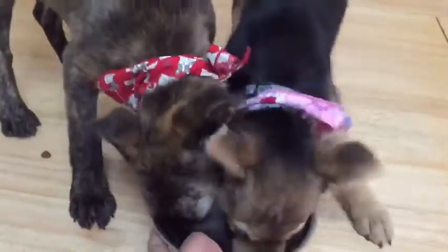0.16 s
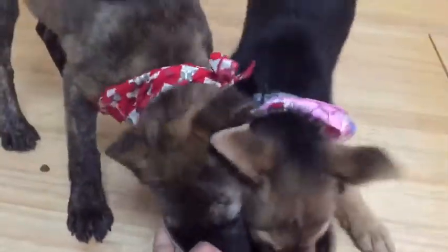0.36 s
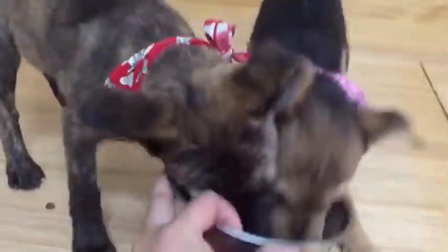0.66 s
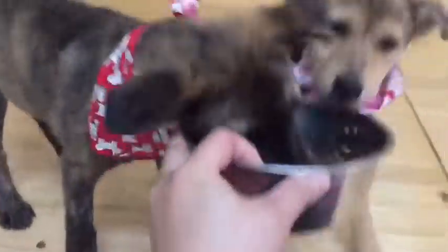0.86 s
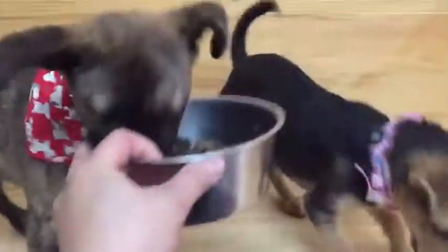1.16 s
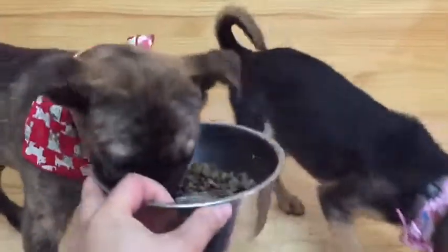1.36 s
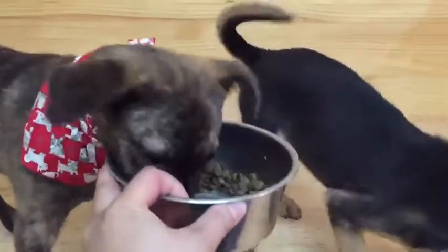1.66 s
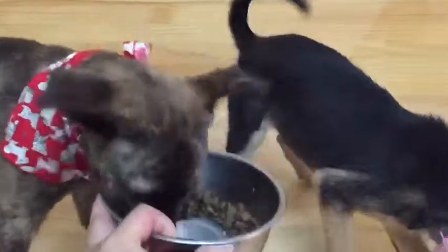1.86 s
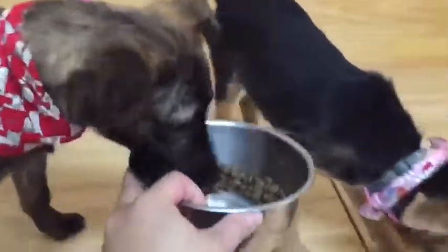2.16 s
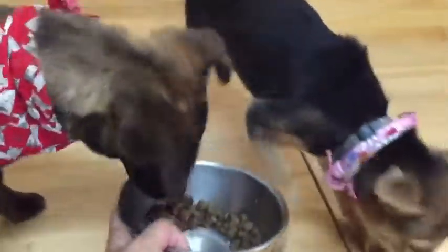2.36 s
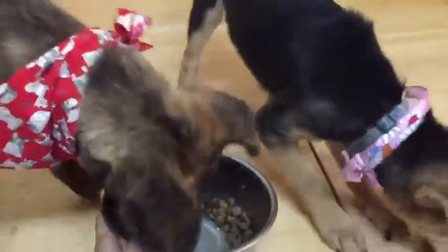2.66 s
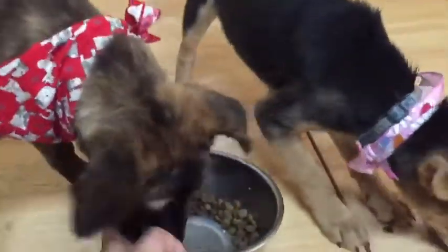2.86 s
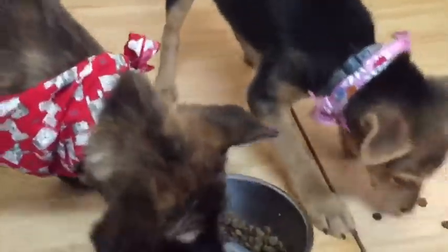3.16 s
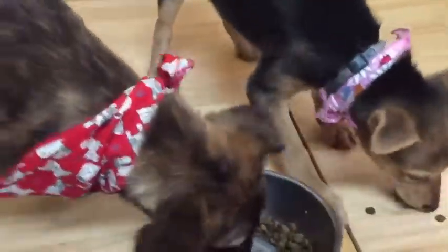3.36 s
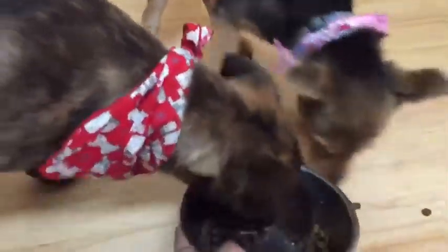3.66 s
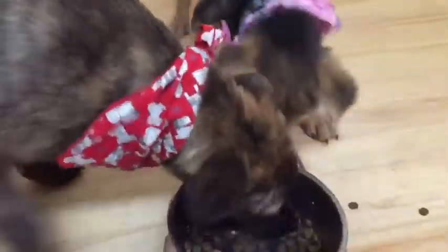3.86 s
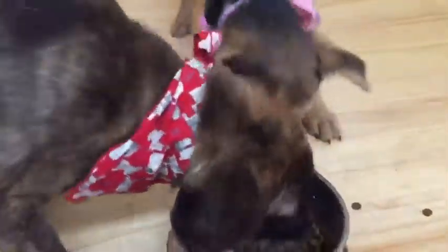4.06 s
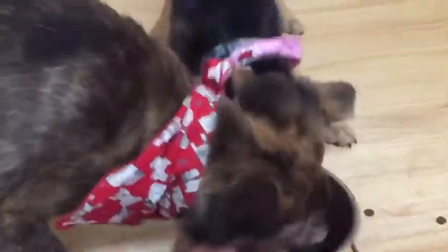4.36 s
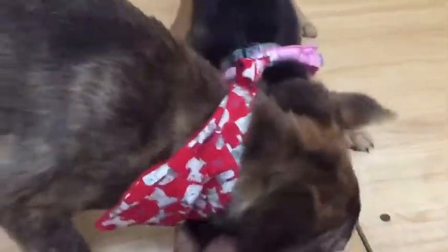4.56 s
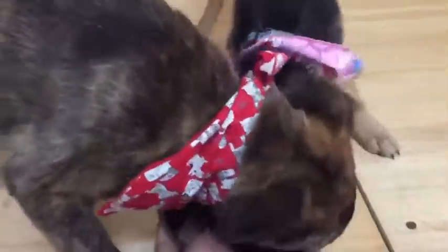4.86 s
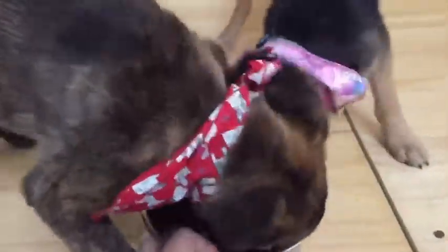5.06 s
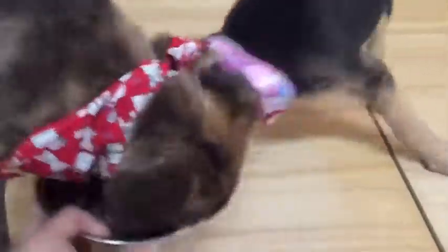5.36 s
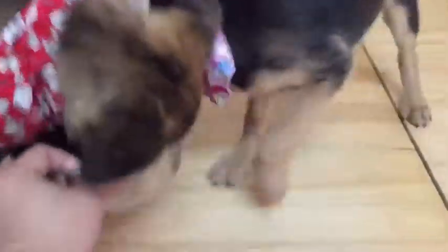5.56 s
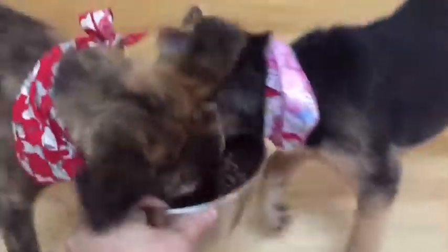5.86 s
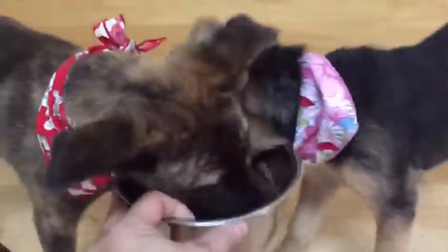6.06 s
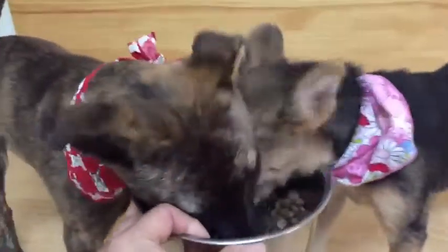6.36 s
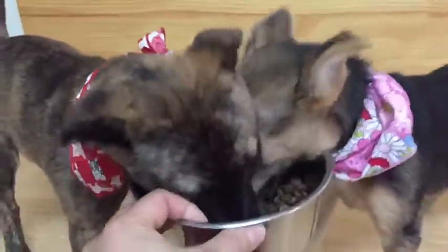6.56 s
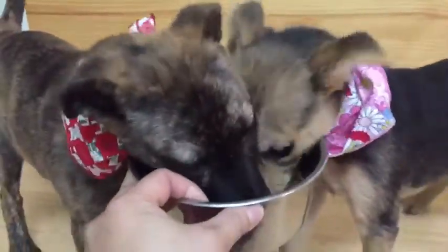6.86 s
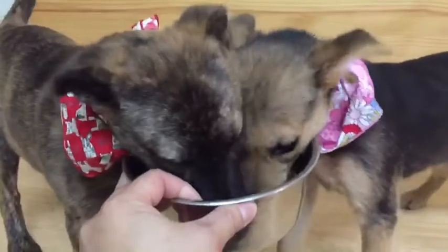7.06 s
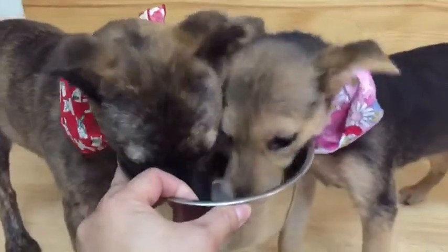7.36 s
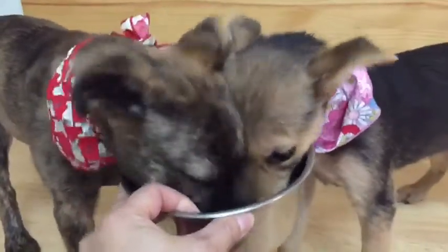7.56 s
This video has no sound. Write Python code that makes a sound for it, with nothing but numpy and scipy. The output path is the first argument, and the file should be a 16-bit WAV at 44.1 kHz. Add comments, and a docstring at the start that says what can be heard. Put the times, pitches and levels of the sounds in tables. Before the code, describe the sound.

Two puppies crunch dry kibble from a steel bowl, pellets rattling, teeth cracking and clicking on metal, with collar tinkles and a few hard bumps indoors.

```python
"""Two puppies eat dry kibble from a hand-held steel bowl over a wooden floor, in a small room.
From the start muzzles stir the pellets, a rattle of many small impacts, and teeth crack them by brittle
fracture. Clicks on the steel and paws shuffling by friction run throughout; metal pieces, likely on a
collar, tinkle in thin modes, mouths smack at a resonance, and later bumps set bowl and boards ringing.
Stirring thins out, and back teeth grind in muffled crackles, over reflections and still air."""
import sys
import numpy as np
from scipy import signal
from scipy.fft import rfft, irfft, next_fast_len
from scipy.io import wavfile
from scipy.ndimage import uniform_filter1d, map_coordinates

SR = 44100
rng = np.random.default_rng(int(sys.argv[2]) if len(sys.argv) > 2 else 0)


def digitize_waveform(pressure):
    """Quantize a signal to 16-bit integers and store it at the path in sys.argv[1].

    Rows of a 2-D input are taken as channels; values are limited to [-1, 1].
    """
    field = np.atleast_2d(pressure).T
    bounded = np.clip(field, -1, 1)
    quanta = np.round(bounded * 32767).astype(np.int16)
    wavfile.write(sys.argv[1], SR, quanta)


N = 340452  # samples

# Levels are relative: a source may add an offset of its own to all of its events.
# muzzle thrusts into the pellets, about three a second: (time of full force [s], hold [s], level [dB])
THRUSTS = [(0.064, 0.13, -38), (0.266, 0.15, -31), (0.542, 0.015, -27), (0.647, 0.18, -30),
           (0.964, 0.017, -36), (1.177, 0.049, -34.5), (1.37, 0.15, -45), (1.509, 0.05, -38),
           (1.784, 0.1, -44.5), (1.988, 0.026, -43.5), (2.235, 0.091, -56), (2.956, 0.5, -51),
           (3.573, 0.23, -36.5), (3.866, 0.13, -35), (4.162, 0.25, -42), (4.431, 0.065, -28.5),
           (4.707, 0.046, -29.5), (5.036, 0.068, -32.5), (5.304, 0.16, -38.5), (5.518, 0.053, -43.5),
           (5.705, 0.18, -42.5), (6.159, 0.014, -35.5), (6.382, 0.14, -50.5), (6.842, 1, -54)]
THRUST_ATTACK_S, THRUST_T60_S = 0.043, 0.39
# loose pellets shifting between the thrusts: (time [s], level [dB])
SHIFTING = [(0.0, -38.5), (1.68, -65.5), (7.72, -65)]
# spectrum of pellets rubbing and colliding: (frequency [Hz], density [dB per Hz])
PELLET_SPECTRUM = [(300, -39), (700, 8.5), (1700, 5.5), (2500, 6), (3600, 10), (5000, 1.5), (6200, 5.5),
                   (8000, -5), (11000, -3), (15500, -16)]
# teeth crack a pellet, or now and then a wet tongue or lip clicks: (time [s], level [dB], treble snap re that
# level [dB])
BITES = [(0.039, -23, -32), (0.167, -23.5, -8), (.199, -23, -7.5), (.3405, -19, -38), (0.367, -22.5, -1),
         (.408, -21.5, -8.5), (0.4777, -20, -15), (0.5262, -17, -15), (0.5597, -15.5, -10),
         (.7, -18, -12.5), (0.7761, -27, 5), (0.856, -30, 6), (0.965, -34, -3.5), (1.1175, -26, -10),
         (1.1694, -17.5, -11), (1.2288, -28, 0.5), (1.359, -36, -12), (1.4284, -28.5, -15),
         (1.6222, -33, -13), (1.788, -30.5, -5), (1.8906, -39.5, 9.5), (2.0257, -31.5, 4),
         (2.3077, -28, -22), (3.0051, -27, -7.5), (3.0694, -26.5, -17), (3.136, -26.5, -10),
         (3.1588, -25.5, -9.5), (3.5196, -33.5, 6), (4.34, -18, -13.5), (4.4662, -12, -17),
         (4.498, -13.5, -24), (4.7168, -19.5, -24), (4.749, -12, -17), (5.036, -33.5, 4),
         (5.0596, -8, -11.5), (5.184, -25.5, -15), (5.3799, -23, -11.5), (5.7867, -27.5, -13),
         (5.8824, -26.5, -4), (6.027, -36, 0.5), (6.267, -29.5, -15), (6.3687, -20.5, -13.5),
         (6.8412, -22, -24.5), (6.8801, -29, -52), (6.9958, -27, -26), (7.052, -27.5, -18),
         (7.3157, -29.5, -27), (7.567, -21, -14.5), (7.667, -26.5, -16)]
# spectrum of a crack or click: (frequency [Hz], density [dB per Hz])
CRACK_SPECTRUM = [(250, -12), (600, -4.5), (850, 11), (1150, 6), (1600, 17.5), (2500, 12), (3600, 17),
                  (5000, 3.5), (6300, 9.5), (8000, -1), (11000, -4), (15500, -19.5)]
# a tooth or pellet taps the steel, dry and short: (time [s], level [dB])
TAPS = [(.0863, -32), (.1152, -32), (.2649, -33), (.45, -29), (.7185, -24), (2.6779, -31), (3.288, -22.5),
        (3.3642, -26), (3.431, -28), (3.446, -28.5), (3.6406, -11.5), (3.66, -27), (3.756, -16),
        (3.9427, -17.5), (4.014, -25), (4.118, -24.5), (4.0364, -19), (4.1502, -23.5), (4.2025, -15),
        (4.2244, -17), (4.5611, -18), (4.7265, -15.5), (4.9157, -23), (5.073, -18), (5.333, -38),
        (5.406, -23.5), (5.461, -25), (5.5602, -25.5), (6.0896, -32.5), (6.653, -43), (7.197, -31.5),
        (7.238, -29), (7.385, -32), (7.5155, -26.5), (7.6149, -35)]
# the bowl or a paw bumps the boards: (time [s], level [dB], hard clatter re that level [dB])
BUMPS = [(1.128, -38.5, -10), (2.384, -39, -17), (2.742, -36.5, -56), (3.2504, -12.5, 4.5),
         (3.387, -27.5, -2.5), (3.7053, -14.5, 5.5), (4.031, -28.5, -41), (4.466, -14.5, 2.5),
         (5.412, -39.5, -23)]
# modes of bowl and boards together: (frequency [Hz], mean level [dB], t60 [s])
BOARD_MODES = [(107, -12, .33), (129, -13, .28), (259, 0, .25), (370, -5, .23), (462, -6, .23),
               (576, -9, .18), (617, -7, .2), (707, -11, .2), (885, -10, .18), (991, -10, .13)]
# a muzzle nudges the held bowl, a dull knock: (time [s], level [dB])
KNOCKS = [(.481, -25.5), (.785, -28), (1.62, -25), (1.813, -32.5), (4.758, -22), (6.157, -31.5),
          (6.179, -29), (6.2672, -25.5), (6.501, -34.5), (7.568, -30.5)]
# a muzzle or tongue drags over the steel: (time [s], length [s], level [dB], upper edge [Hz])
SCRAPES = [(0.55, 0.034, -17.5, 6800), (0.676, 0.051, -23.5, 7400), (1.553, 0.044, -30.5, 11200),
           (2.675, 0.18, -41.5, 2550), (4.445, 0.024, -17, 7700), (5.065, 0.025, -23, 8900),
           (5.376, 0.057, -25.5, 6100), (6.178, 0.05, -32.5, 5030)]
# tongues and jaws work in the hollow of the bowl: (time [s], level [dB])
LAPPING = [(0.0, -49), (0.54, -39.5), (1.4, -50), (2.37, -61.5), (3.89, -50.5), (6.86, -60.5), (6.94, -52),
           (7.72, -62.5)]
# hollow, wet smacks of a mouth: (time [s], level [dB], mean resonance [Hz])
SMACKS = [(.798, -31, 594), (1.286, -43, 357), (1.493, -44, 351.6), (2.243, -47.5, 792),
          (2.306, -36.5, 1380), (6.704, -43.5, 1470), (6.995, -35.5, 1333), (7.055, -43.5, 718),
          (7.316, -35, 1425), (7.614, -38, 1370)]
# back teeth grinding: (time of full force [s], hold [s], level [dB])
GRINDS = [(6.88, 0.19, -54), (7.24, 0.1, -56), (7.58, 0.13, -51)]
# a paw or the sliding bowl shoves against the boards: (time of full force [s], hold [s], level [dB])
SHOVES = [(.08, 0.23, -37.5), (.5, .01, -42), (.69, 0.013, -40), (1.19, 0.016, -41), (2.43, 0.0029, -42.5),
          (3.75, 0.44, -40), (5.43, 0.026, -34.5), (5.6, 0.11, -44), (5.81, 0.08, -40.5), (6.13, 0.03, -42)]
SHOVE_ATTACK_S, SHOVE_T60_S = 0.13, 0.24
FIDGET_DB = -61.5  # paws never stand quite still; same scale as the shoves
# spectrum of paws and bowl on the boards: (frequency [Hz], density [dB per Hz])
SCUFF_SPECTRUM = [(25, -110), (55, -2.5), (85, 3), (112, 13.5), (160, 1.5), (260, 1.5), (400, -1.5),
                  (900, -41)]
# tinkles, one list for each metal piece: (time [s], level [dB])
TINKLES = [
    [(.279, -29), (1.605, -34), (1.69, -34.5), (2.085, -41.5), (2.194, -41.5), (2.787, -39), (2.855, -39.5),
     (3.098, -38), (3.485, -36), (4.26, -40), (5.543, -40), (5.68, -36.5), (5.727, -32.5)],
    [(.755, -33), (.894, -34), (1.369, -35.5), (2.349, -40.5), (2.517, -46.5), (2.915, -32.5),
     (3.232, -35.5), (3.338, -38.5), (4.225, -33.5), (4.292, -30), (4.554, -33.5), (4.578, -34),
     (4.671, -34.5), (4.833, -35), (5.484, -35.5), (6.423, -37)],
]
# modes of the two metal pieces, one list each: (mean frequency [Hz], mean level [dB], t60 [s])
PIECE_MODES = [
    [(4530, 0, 0.068), (5880, 0, 0.024), (11180, -7, 0.04)],
    [(5170, 3.5, 0.057), (5370, 5, 0.025), (12370, -7, 0.04)],
]
# decay of the room: (frequency [Hz], t60 [s])
ROOM_DECAY = [(150, 0.42), (1000, 0.29), (4000, 0.13)]
# spectrum of the still air: (frequency [Hz], density [dB per Hz])
AIR_SPECTRUM = [(25, -49), (60, 11.5), (120, -12), (700, -17), (2000, -14.5), (6000, -37), (9000, -32)]
TOP_HZ, CEILING = 15900, .72  # band limit [Hz] and peak amplitude limit


def amp(db):
    """Logarithmic level: decibels to amplitude gain."""
    return 10 ** (np.asarray(db) / 20)


def unit(x):
    """Power normalisation: x at rms 1."""
    return x / np.sqrt(np.mean(x ** 2) + 1e-20)


def strike(x, size=256):
    """Short-time power: x scaled so that its loudest few milliseconds have rms 1."""
    return x / np.sqrt(uniform_filter1d(x ** 2, size).max() + 1e-20)


def along(points, hz):
    """Interpolation of (Hz, value) points on a logarithmic frequency axis."""
    f, v = np.transpose(points)
    return np.interp(np.log(hz + 1), np.log(f + 1), v)


def curves(rows):
    """Linear interpolation in time: one curve for each column after the time."""
    s, *cols = np.transpose(rows)
    return [np.interp(np.arange(N) / SR, s, c) for c in cols]


def wobble(rate):
    """Slow random modulation: a smooth curve through rate random knots a second."""
    knots = rng.standard_normal(int(N * rate / SR) + 4)
    return map_coordinates(knots, [np.arange(N) * rate / SR])


def coloured(x, spectrum):
    """Minimum-phase filtering: x takes on a spectrum causally, by folding the cepstrum."""
    m = 2 * next_fast_len(len(x) // 2 + 2048)
    gain = amp(along(spectrum, np.fft.rfftfreq(m, 1 / SR)))
    cepstrum = irfft(np.log(gain))
    cepstrum[1:m // 2] *= 2
    cepstrum[m // 2 + 1:] = 0
    return irfft(rfft(x, m) * np.exp(rfft(cepstrum)), m)[:len(x)]


def band(x, edges_hz, kind, order=3):
    """Maximally flat filtering: a low-, high- or band-pass of x."""
    return signal.sosfilt(signal.butter(order, edges_hz, kind, fs=SR, output="sos"), x)


def ripple(depth_db=4.2, count=64):
    """Chance resonances: every pellet and every shape of the mouth has its own spectrum."""
    hz = TOP_HZ * np.linspace(0, 1, count) ** 2
    return np.column_stack([hz, depth_db * np.clip(rng.standard_normal(count), -2, 2)])


def grains(size, rate, spread_db):
    """Random point process: tiny impacts of uneven strength and either sign, rate a second."""
    hits = rng.random(size) < rate / SR
    signs = rng.choice([-1, 1], size)
    return hits * signs * amp(spread_db * np.clip(rng.standard_normal(size), -2, 2))


def pings(rate, low_hz, high_hz, t60, spread_db):
    """Superposed damped oscillators: random soft impacts, each at a pitch of its own; rms 1."""
    when, force, pitch = rng.random((int(rate * N / SR), 3)).T[:, :, None]
    t = np.arange(SR // 40) / SR
    hz = low_hz + (high_hz - low_hz) * pitch
    ring = np.sin(2 * np.pi * hz * t) * amp(spread_db * force - 60 * t / t60)
    where = (when * N).astype(int) + np.arange(len(t))
    return unit(np.bincount(where.ravel(), ring.ravel(), N)[:N])


def swell(size, attack_s):
    """Transient envelope: an exponential rise, then a fade to nothing over size samples."""
    k = np.arange(size)
    return (1 - np.exp(-k / SR / attack_s)) * np.sqrt(1 - k / size)


def gestures(rows, attack_s, t60):
    """Addition of powers: gain of movements that each swell, hold and decay exponentially."""
    t = np.arange(0, N, 32) / SR  # every 32nd sample is enough for slow gains
    power = 0
    for s, hold, db in rows:
        rise = np.clip((t - s) / attack_s + 1, 0, 1) ** 2
        decay = amp(db - 60 * np.maximum(t - s - hold, 0) / t60)
        power = power + (decay * rise) ** 2
    return np.interp(np.arange(N) / SR, t, np.sqrt(power))


def add(track, s, sound):
    """Linear superposition: mix a sound into the track at time s."""
    part = track[max(round(s * SR), 0):][:len(sound)]
    part += sound[:len(part)]


def stir_level():
    """Addition of powers: stirring effort in dB, thrusts over a faint, unbroken shifting."""
    shifting_db, = curves(SHIFTING)
    thrusts = gestures(THRUSTS, THRUST_ATTACK_S, THRUST_T60_S)
    return 20 * np.log10(np.hypot(thrusts, amp(shifting_db)))


def stirring(level_db=-4.0, rub_db=-12, brightening=0.099, brisk_db=-42, ping_db=-2, count=3):
    """Granular collision: clumps of pellets tumble and ping on the steel, brighter when brisk."""
    stir_db = stir_level()
    rattle = np.zeros(N)
    for _ in range(count):
        ticks = unit(grains(N, rate=380, spread_db=3.0)) + amp(rub_db) * rng.standard_normal(N)
        clumps = amp(6 * np.clip(wobble(60), -2, 1.6))
        rattle += unit(coloured(ticks * clumps, ripple()))
    ringing = pings(rate=420, low_hz=600, high_hz=7500, t60=.016, spread_db=26)
    rattle = unit(coloured(rattle, PELLET_SPECTRUM))
    rattle += amp(ping_db) * unit(coloured(ringing, PELLET_SPECTRUM))
    dull = band(rattle, 2900, "lowpass", order=1)
    treble_gain = amp(brightening * (stir_db - brisk_db))
    return amp(stir_db + level_db) * (dull + treble_gain * (rattle - dull))


def bites(level_db=-5, knock_db=-10, snap_gain_db=7, fracture_t60=0.049, crumb_t60=0.061):
    """Brittle fracture: a click and a sharp break, then a dying run of smaller ones."""
    out, t = np.zeros(N), np.arange(SR // 8) / SR
    for s, db, snap_db in BITES:
        click = rng.standard_normal(len(t)) * amp(12 - 60 * t / .003)
        fracture = rng.standard_normal(len(t)) * amp(-60 * t / fracture_t60)
        crumbs = unit(grains(len(t), rate=1500, spread_db=6.5)) * amp(-60 * t / crumb_t60)
        breaking = click + coloured(fracture, ripple()) + coloured(crumbs, ripple())
        crack = coloured(breaking, CRACK_SPECTRUM)
        body = strike(band(crack, [1200, 4800], "bandpass"))
        knock = amp(knock_db) * strike(band(crack, 720, "lowpass"))
        snap = amp(snap_db + snap_gain_db) * strike(band(crack, 7100, "highpass"))
        add(out, s, amp(db + level_db) * (body + knock + snap))
    return out


def taps(level_db=-5, t60=0.014, stray_db=2, stray_spread_db=5.5, count=60):
    """Damped impact: brief clicks, and stray pellets whose force follows the stirring."""
    out, t = np.zeros(N), np.arange(SR // 25) / SR
    where = rng.integers(N, size=count)
    stray_levels = stir_level()[where] + stray_db + stray_spread_db * rng.standard_normal(count)
    strays = np.column_stack([where / SR, stray_levels])
    for s, db in np.vstack([np.add(TAPS, [0, level_db]), strays]):
        burst = rng.standard_normal(len(t)) * amp(-60 * t / t60)
        click = coloured(coloured(burst, CRACK_SPECTRUM), ripple())
        add(out, s, amp(db) * strike(band(click, 3660, "lowpass", order=2)))
    return out


def boards(t):
    """Modal sum: bowl and boards ring; the rocking bowl varies mode strengths and pitches slightly."""
    ring = np.zeros(len(t))
    for hz, level, t60 in BOARD_MODES:
        decay = amp(level + rng.normal(0, 1.5) - 60 * t / t60)
        drift = rng.random() + .0018 * np.cumsum(rng.standard_normal(len(t)))  # phase in cycles
        ring += decay * np.sin(2 * np.pi * (hz * t + drift))
    return ring


def bumps(level_db=-2, thud_db=-13, clatter_gain_db=-7, thud_t60=0.36, clatter_t60=0.12, attack_s=0.00023):
    """Impact excitation of modes: hard blows wake the upper ones and rattle the bowl unevenly."""
    out, t = np.zeros(N), np.arange(SR // 2) / SR
    for s, db, hard_db in BUMPS:
        hardness = [(350, 0), (700, min(hard_db, 0))]  # (frequency [Hz], gain [dB])
        ring = coloured(boards(t) * (1 - np.exp(-t / attack_s)), hardness)
        thud = band(rng.standard_normal(len(t)), [110, 480], "bandpass") * amp(-60 * t / thud_t60)
        rattle = band(grains(len(t), rate=1100, spread_db=4.5), [340, 1050], "bandpass", order=2)
        clatter = amp(hard_db + clatter_gain_db) * strike(rattle * amp(-60 * t / clatter_t60))
        add(out, s, amp(db + level_db) * (strike(ring) + amp(thud_db) * strike(thud) + clatter))
    return band(out, 80, "highpass")


def knocks(t60=0.031):
    """Heavy damping: the hand on the bowl leaves one blunt push and a short, hollow knock."""
    out, t = np.zeros(N), np.arange(SR // 8) / SR
    for s, db in KNOCKS:
        push = rng.standard_normal(len(t)) * amp(-60 * t / t60)
        push[0] += 10
        add(out, s, amp(db) * strike(band(push, [280, 950], "bandpass", order=2)))
    return out


def scrapes(low_hz=850, attack_s=0.0017, fade_db=-7):
    """Stick-slip friction: a drag catches at once and fades as a dense run of small slips."""
    out = np.zeros(N)
    for s, length, db, top_hz in SCRAPES:
        size = int(length * SR)
        slips = unit(grains(size, rate=3600, spread_db=3.0)) + rng.standard_normal(size)
        rasp = coloured(coloured(slips, PELLET_SPECTRUM), ripple())
        rasp = unit(band(rasp, [low_hz, top_hz], "bandpass"))
        fade = amp(np.linspace(0, fade_db, size))
        add(out, s, amp(db) * rasp * swell(size, attack_s) * fade)
    return out


def lapping(wash_db=-5, between_db=-5):
    """Cavity resonance: soft, hollow plops over a wet wash, mostly during the thrusts."""
    lap_db, = curves(LAPPING)
    equal_thrusts = [(s, hold, 0) for s, hold, _ in THRUSTS]
    working = gestures(equal_thrusts, THRUST_ATTACK_S, THRUST_T60_S)
    plops = pings(rate=260, low_hz=540, high_hz=1080, t60=.026, spread_db=20)
    wash = amp(wash_db) * rng.standard_normal(N)
    wet = unit(band(plops + wash, [320, 1400], "bandpass"))
    return amp(lap_db) * np.hypot(working, amp(between_db)) * wet


def smacks(cycles=25, sag=0.041, width_hz=190, rough_db=3):
    """Moving cavity resonance: the wet mouth rings roughly at a pitch that sags with the jaw."""
    out = np.zeros(N)
    for s, db, hz in SMACKS:
        size = int(cycles / hz * SR)
        a, b = unit(band(rng.standard_normal((2, SR)), width_hz, "lowpass"))[:, -size:]
        phase = 2 * np.pi * hz * np.cumsum(np.linspace(1 + sag, 1 - sag, size)) / SR
        # slow noise on both quadratures is a narrow band of noise about the pitch
        ring = np.sin(phase) + amp(rough_db) * (a * np.sin(phase) + b * np.cos(phase))
        add(out, s, amp(db) * unit(ring * swell(size, 0.00067)))
    return out


def grinding(rate=130, spread_db=4, t60=0.075, count=3):
    """Low-pass transmission: broken pieces crackle softly, muffled by the cheeks."""
    crumbs = sum(coloured(grains(N, rate, spread_db), ripple()) for _ in range(count))
    muffled = unit(band(coloured(crumbs, PELLET_SPECTRUM), 1200, "lowpass", order=1))
    return gestures(GRINDS, THRUST_ATTACK_S, t60) * muffled


def tinkles(level_db=-4, touch_db=-1, touch_t60=0.021, faint_db=-47, bounce_s=0.011, bounce_db=-4, count=17):
    """Repeated modal impact: ever weaker contacts, each a rasp and a thin ring; faint ones between."""
    out, t = np.zeros(N), np.arange(SR // 8) / SR
    for touches, modes in zip(TINKLES, PIECE_MODES):
        faint = [(s, faint_db) for s in rng.random(count) * touches[-1][0]]
        for s, db in list(touches) + faint:
            chatter = np.zeros(len(t))
            delays = np.append(0, np.cumsum(2 * bounce_s * rng.random(3)))  # mean gap bounce_s
            for k, delay in enumerate(delays):
                ring = np.zeros(len(t))
                for hz, level, t60 in modes:
                    decay = amp(level + rng.normal(0, 3.5) - 60 * t / t60)
                    ring += decay * np.sin(2 * np.pi * hz * rng.normal(1, .008) * t)
                rasp = unit(band(rng.standard_normal(len(t)), [4600, 6600], "bandpass"))
                touch = rasp * amp(touch_db - 60 * t / touch_t60)
                add(chatter, delay, amp(k * bounce_db) * (ring + touch) * swell(len(t), 0.001))
            add(out, s, amp(db + level_db) * strike(chatter))
    return out


def shuffling(level_db=-2, lump_db=3, ring_db=-11):
    """Forced vibration: paws and sliding bowl push unevenly on boards that hum at their modes."""
    force = np.hypot(gestures(SHOVES, SHOVE_ATTACK_S, SHOVE_T60_S), amp(FIDGET_DB))
    push = rng.standard_normal(N) * amp(lump_db * wobble(25))
    hum = signal.fftconvolve(push, boards(np.arange(SR // 2) / SR))[:N]
    hum = unit(band(hum, 490, "lowpass"))
    return force * amp(level_db) * (unit(coloured(push, SCUFF_SPECTRUM)) + amp(ring_db) * hum)


def room(x, gap_s=0.0033, count=24):
    """Reverberation: walls answer after a gap, with a diffuse tail; treble dies first."""
    out = np.zeros(N)
    for where in np.array_split(np.arange(N), count):  # a new random tail for each block
        hz, t, z = signal.stft(rng.standard_normal(SR // 2), SR, nperseg=256)
        decay = amp(-60 * t / along(ROOM_DECAY, hz)[:, None])
        tail = signal.istft(z * decay, SR, nperseg=256)[1]
        reflections = signal.fftconvolve(x[where], tail / np.linalg.norm(tail))
        add(out, where[0] / SR + gap_s, reflections)
    return out


def still_air(level_db=-60):
    """Stationary noise: the steady, coloured hush of the room."""
    return amp(level_db) * unit(coloured(rng.standard_normal(N), AIR_SPECTRUM))


def scene(wet_db=-10):
    """Linear superposition: the meal, its reflections and the still air of the room."""
    meal = stirring() + bites() + taps() + bumps() + knocks() + scrapes()
    meal += lapping() + smacks() + grinding() + tinkles() + shuffling()
    return (meal + amp(wet_db) * room(meal) + still_air())[None]


def record(dry):
    """Soft saturation rounds off the highest peaks; a sharp low-pass removes all above TOP_HZ."""
    held = dry / (1 + (dry / CEILING) ** 6) ** (1 / 6)
    m = next_fast_len(N + SR // 2)
    passed = np.fft.rfftfreq(m, 1 / SR) < TOP_HZ
    return irfft(rfft(held, m) * passed, m)[..., :N]


dry = scene()
out = record(dry)
digitize_waveform(out)
```